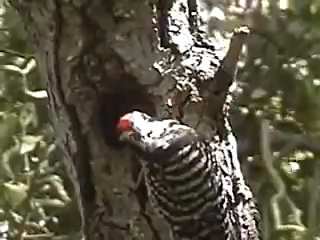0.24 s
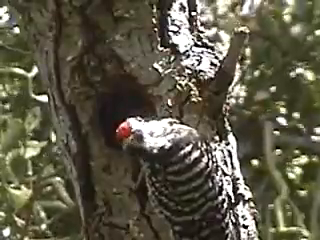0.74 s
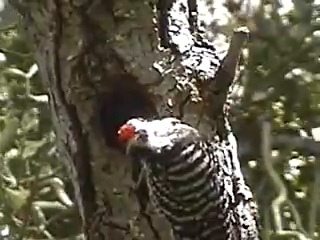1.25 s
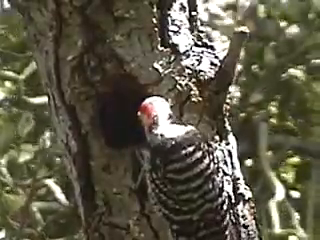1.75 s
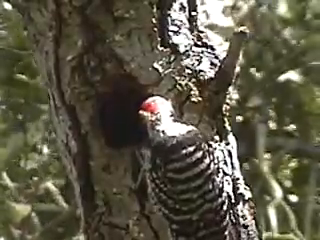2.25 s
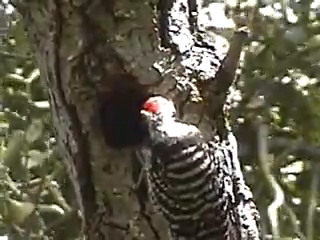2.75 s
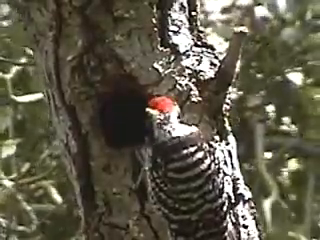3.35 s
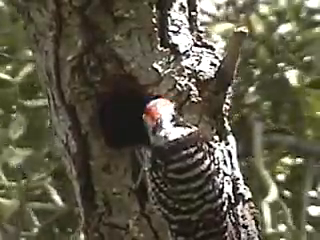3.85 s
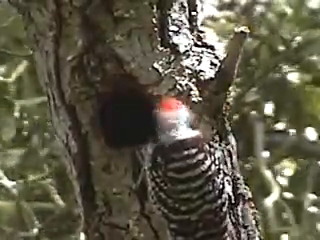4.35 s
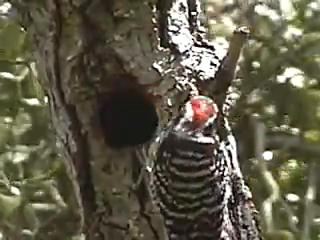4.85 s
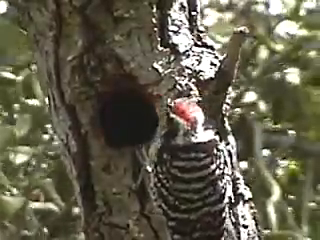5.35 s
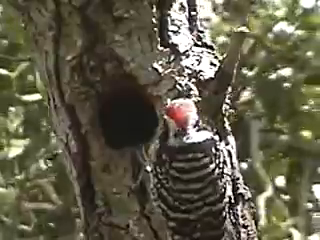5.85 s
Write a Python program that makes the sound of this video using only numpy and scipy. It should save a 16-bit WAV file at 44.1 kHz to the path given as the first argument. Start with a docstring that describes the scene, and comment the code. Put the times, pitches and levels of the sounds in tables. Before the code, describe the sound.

A close woodpecker at a tree, picked up by a small camera microphone with low rumble, faint hiss and a slightly metallic, comb-like colour. Quiet chirps come first, then a cracked note and a strained, wavering squeal. A loud snappy chip follows, then a long piercing squeak and a string of short squeaks at a quickening pace. A couple of dull microphone bumps and faint far calls sit in the steady outdoor rush, which continues alone at the end.

```python
"""A woodpecker at its nest hole, over a steady outdoor rush of filtered noise with faint, blurred far calls.
Soft chirps come first, their upper harmonics picked out by the throat; then a gritty note and a wavering squeal.
A sharp chip, a pitch plunging within milliseconds, opens a run of high squeaks that draws closer together.
Squeal and squeaks are near-pure gliding whistles, scattered by trunk and foliage.
The camera's comb filter against motor hum makes each glide beat against its own repeats."""
import sys
import numpy as np
from scipy import signal
from scipy.fft import rfft, irfft
from scipy.io import wavfile
from scipy.ndimage import uniform_filter1d

SR = 44100
rng = np.random.default_rng(int(sys.argv[2]) if len(sys.argv) > 2 else 0)


def digitize_waveform(pressure):
    """Quantize a signal to 16-bit integers and store it at the path in sys.argv[1].

    Rows of a 2-D input are taken as channels; values are limited to [-1, 1].
    """
    field = np.atleast_2d(pressure).T
    bounded = np.clip(field, -1, 1)
    quanta = np.round(bounded * 32767).astype(np.int16)
    wavfile.write(sys.argv[1], SR, quanta)


N = 268480
T = np.arange(N) / SR  # s
FREQS = np.arange(N // 2 + 1) * SR / N  # Hz
LEFT_RIGHT = np.array([[1], [-1]])  # signs of a side signal at the two ears
TREMBLE_HZ = 10  # pitch tremble per unit of shake, in squeal and squeaks


def undb(db):
    """Decibels to gain."""
    return 10 ** (np.asarray(db) / 20)


def unit(x):
    """Scale to rms 1."""
    return x / np.sqrt(np.mean(x ** 2))


def curve(rows, column=1):
    """One column of a timed table, joined by straight lines."""
    rows = np.array(rows, float)
    return np.interp(T, rows[:, 0], rows[:, column])


def colour(points):
    """Gain at every frequency from (Hz, dB) points, joined on a log frequency scale."""
    hz, db = np.transpose(points)
    return undb(np.interp(np.log(FREQS + 1), np.log(hz + 1), db))


def shaped(x, gain):
    """Filter by a gain for every frequency."""
    return irfft(rfft(x) * gain, N)


def noise(gain):
    """Noise of rms 1 with the given spectrum."""
    return unit(shaped(rng.standard_normal(N), gain))


def band(hz, width_hz):
    """A bell-shaped pass band."""
    return np.exp(-2 * ((FREQS - hz) / width_hz) ** 2)


def hiss():
    """The microphone's own smooth treble hiss: one broad bell of noise."""
    return undb(-75) * noise(band(9000, 3400))


def background():
    """A distant rush: steady rumble, a slowly swelling and wavering range above it, and narrow noise drones."""
    # Spectrum of the rush: pitch_hz, relative_density_db
    air = [(20, -21), (50, -14.5), (85, -4.5), (170, 0), (270, -9.5), (550, -6.5), (980, -5), (1400, -11.5),
           (2000, -18), (3000, -25), (6500, -33), (8800, -36.5), (12000, -63.5), (13000, -59)]
    # Stereo width of the rush: pitch_hz, side_minus_mid_db
    air_side = [(30, -24), (60, -33), (110, -29), (220, -36.5), (360, -30.5), (660, -18), (1200, -11.5),
                (2200, -13.5), (4000, -9), (7500, -5.5), (13000, 9)]
    # Slow level of the rush above its rumble: time_s, level_db
    air_swell = [(0, -45), (2.64, -46), (2.84, -42.5), (2.96, -44.5), (3.2, -45), (4.7, -48.5), (6.08, -47)]
    # Narrow noise bands: pitch_hz, width_hz, level_db
    drone_bands = [(127, 38, -55), (3995, 220, -71)]

    spectrum = colour(air)
    mid = shaped(rng.standard_normal(N), spectrum)
    side = shaped(rng.standard_normal(N), spectrum * colour(air_side))
    middle = (FREQS > 400) & (FREQS < 2000)  # the level reference
    rush = (mid + side * LEFT_RIGHT) / np.std(shaped(mid, middle))
    rumble = shaped(rush, 1 / (1 + (FREQS / 350) ** 4))
    waver_db = 0.93 * noise(band(0, 4.4))
    swell_db = curve(air_swell) + waver_db
    drones = sum(undb(db) * noise(band(hz, width_hz)) for hz, width_hz, db in drone_bands)
    return undb(-46.5) * rumble + undb(swell_db) * (rush - rumble) + drones


def far_calls(width_hz=70, octave_db=-16):
    """Distance blurs each call into two narrow noise bands an octave apart that swell and fade."""
    # Faint distant calls: middle_s, length_s, pitch_hz, level_db
    distant_calls = [(1.095, 0.064, 1040, -45.5), (2.05, 0.089, 923, -47), (2.81, 0.16, 1000, -44.5),
                     (3.166, 0.095, 990, -45.5), (3.247, 0.033, 1428, -45)]
    out = np.zeros(N)
    for middle_s, length_s, hz, db in distant_calls:
        tone = noise(band(hz, width_hz) + undb(octave_db) * band(2 * hz, 2 * width_hz))
        out += undb(db) * np.exp(-2 * ((T - middle_s) / length_s) ** 2) * tone
    return out


def bumps(width_s=0.0047, left_db=-7):
    """Dull bumps at the microphone: single slow pressure swings, stronger on the right."""
    # Bumps: middle_s, right_level_db
    bump_times = [(3.15, -36), (3.531, -31), (4.345, -50), (4.5, -45)]
    out = np.zeros(N)
    for middle_s, db in bump_times:
        u = (T - middle_s) / width_s
        out += undb(db) * (1 - u ** 2) * np.exp(-u ** 2 / 2)
    return out * undb([[left_db], [0]])


def chirps():
    """Short swelling notes whose pitch sags and then drops; the throat picks out their upper harmonics."""
    # Soft nasal chirps: start_s, length_s, pitch_hz, final_fall_share, level_before_throat_db, flutter_share
    soft_chirps = [(.005, 0.044, 3160, 0.23, -35.5, 0.045), (.228, 0.025, 2870, 0.2, -47, 0.027),
                   (0.748, 0.03, 3070, 0.056, -40, 0.045), (0.782, 0.01, 4200, 0.02, -32, 0.015),
                   (0.789, 0.038, 3075, 0.27, -24, 0.027), (0.811, 0.021, 3050, 0.092, -24, 0.022),
                   (1.087, 0.029, 2850, 0.69, -39.5, 0.035), (1.213, 0.038, 2840, 0.4, -33, 0.025),
                   (1.52, 0.034, 2830, 0.36, -45, 0.033), (1.665, 0.046, 2766, 0.017, -36.5, 0.019),
                   (1.803, 0.025, 5300, .02, -40, .015)]
    # Throat resonance: pitch_hz, gain_db
    throat = [(3000, -30), (4500, -20), (6100, -21.5), (7300, -12), (9000, -16.5), (10500, -25),
              (12500, -46)]
    throat_hz, throat_db = np.transpose(throat)
    flutter = noise(band(350, 1000))
    out = np.zeros(N)
    for start_s, length_s, hz, fall, db, rough in soft_chirps:
        on = (T > start_s) & (T < start_s + length_s)
        u = (T[on] - start_s) / length_s
        glide = 1 + 0.068 * (1 - u) ** 3 - fall * u ** 3
        pitch_hz = hz * (1 + rough * flutter[on]) * glide
        phase = 2 * np.pi * np.cumsum(pitch_hz) / SR
        tone = 0
        for k in range(1, 5):
            tone = tone + undb(np.interp(k * pitch_hz, throat_hz, throat_db)) * np.sin(k * phase)
        out[on] += undb(db) * np.sqrt(np.abs(np.sin(np.pi * u))) * tone
    return out


def quiver(rate_hz=132, drift=0.115, jitter=0.35):
    """A fast, nearly regular shake of the syrinx, with some jitter on top; rms near 1."""
    moving_rate_hz = rate_hz * (1 + drift * noise(band(0, 41.2)))
    shake = np.sqrt(2) * np.sin(2 * np.pi * np.cumsum(moving_rate_hz) / SR)
    return shake + jitter * noise(band(353.4, 640))


def whistle(hz, level_db, overtone_db, rasp, fall_db_per_khz=7.5):
    """One note of the syrinx: a sine on a moving pitch; low notes carry more overtones and rasp."""
    swell = uniform_filter1d(undb(level_db), size=16)  # softens clicks
    on = swell > 1e-6
    phase = 2 * np.pi * np.cumsum(hz[on]) / SR
    khz_above = np.clip((hz[on] - 4200) / 1000, 0, 5)
    rich = undb(overtone_db - fall_db_per_khz * khz_above)
    out = np.zeros(N)
    out[on] = np.sin(phase) + rich * (np.sin(2 * phase) + rasp[on]) + rich ** 2 * np.sin(3 * phase)
    return swell * out


def edges(start_s, end_s, rise_s, scoop_power=1.5):
    """A note scoops up as it swells and hooks down as it fades: (pitch bend Hz, level dB)."""
    scoop_hz_per_s, attack_db = 100000, 27.5
    drop_hz, drop_s, release_db, release_s = 1650, 0.0052, 20, 0.0086
    close_s = 0.0022  # the very last of the note ramps to silence
    to_rise = np.clip((start_s + rise_s - T) / rise_s, 0, 1)  # 1 at the start, 0 once risen
    to_end_s = np.maximum(end_s - T, 0)
    scoop_hz = scoop_hz_per_s * rise_s * to_rise ** scoop_power
    bend_hz = -scoop_hz - drop_hz * np.exp(-to_end_s / drop_s)
    closing_db = 20 * np.log10(np.clip(to_end_s / close_s, 1e-6, 1))
    db = -attack_db * to_rise - release_db * np.exp(-to_end_s / release_s) + closing_db
    return bend_hz, np.where((T > start_s) & (T < end_s), db, -np.inf)


def long_note(rows, level_db, tremble_hz, overtone_db, rasp):
    """A held whistle on its own pitch curve, with the short notes' swell and fade but no scoop or hook."""
    rise_s, finish_s = 0.0009, 0.012
    _, edge_db = edges(rows[0][0] - rise_s, rows[-1][0] + finish_s, rise_s)
    return whistle(curve(rows) + tremble_hz, level_db + edge_db, overtone_db, rasp)


def squeal(shake, rasp):
    """A gritty opening note, then a long climbing one that throbs under strain and clears at the top."""
    # Short opening note that cracks downwards: time_s, pitch_hz, level_before_trim_db
    opening_points = [(1.951, 5570, -32.5), (1.972, 5650, -26), (1.984, 5740, -33), (1.992, 5660, -18.5),
                      (2.004, 5420, -28), (2.019, 5620, -19), (2.03, 4270, -20.5), (2.044, 4215, -28),
                      (2.06, 4230, -42)]
    # Long wavering note: time_s, pitch_hz, level_before_trim_db
    climb_points = [(2.112, 5500, -37), (2.13, 5910, -27), (2.146, 6160, -24), (2.173, 6490, -24),
                    (2.181, 5820, -10.5), (2.194, 6100, -43), (2.215, 6620, -27), (2.262, 7065, -31.5),
                    (2.31, 7112, -22), (2.36, 7176, -21.5), (2.4, 7200, -27.5), (2.44, 7305, -20.5),
                    (2.49, 7640, -23), (2.519, 7900, -26), (2.527, 8170, -18.5), (2.545, 8234, -22),
                    (2.58, 8040, -25), (2.596, 7970, -32), (2.605, 7476, -21.5), (2.638, 7430, -30),
                    (2.66, 7380, -20), (2.71, 6760, -34)]
    # Strain, which makes pitch tremble and level throb: time_s, strain_0_to_1
    strain_points = [(2.1, .15), (2.2, 0.5), (2.27, 0.8), (2.32, 0.54), (2.38, 0.7), (2.44, 1), (2.48, .6),
                     (2.52, 0), (2.7, 0.4)]
    opening_trim_db, climb_trim_db = -2, -1
    strain_hz, throb_db = 35, 4.5  # per unit of shake at full strain
    grit_hz, grit_db = 35, 1.2  # rms at full grit

    strain = curve(strain_points)
    low = np.clip((7000 - curve(climb_points)) / 1000, 0, 1)  # grit grows below 7 kHz
    tremble_hz = shake * (TREMBLE_HZ + strain_hz * strain) + grit_hz * low * noise(band(300, 700))
    rough_db = throb_db * strain * (shake - .5) + grit_db * low * noise(band(180, 420))
    opening_db = curve(opening_points, column=2) + opening_trim_db + rough_db
    climb_db = curve(climb_points, column=2) + climb_trim_db + rough_db
    opening = long_note(opening_points, opening_db, tremble_hz, overtone_db=-4.5, rasp=undb(-14) * rasp)
    climb = long_note(climb_points, climb_db, tremble_hz, overtone_db=-1.5, rasp=undb(-49) * rasp)
    return opening + climb


def chips(rasp):
    """The pitch plunges within a few ms while the level flares and dies; overtones dull less with pitch."""
    # Sharp plunges that open a squeak, some doubled:
    # loudest_s, rise_s, fade_s, plunge_s, top_hz, bottom_hz, level_db, overtones_db (at 4200 Hz and below)
    chip_plunges = [(3.145, 0.0004, 0.0011, 0.00045, 8830, 3440, -4, -10),
                    (3.1472, 0.00074, 0.0016, 0.00081, 4740, 2880, -7.5, -16),
                    (3.3532, 0.0011, 0.0015, 0.00076, 9700, 9500, -24, -43),
                    (4.1241, 0.0011, 0.00035, 0.0007, 10230, 4620, -6.5, -45),
                    (4.1241, 0.00028, .0006, 0.00084, 6680, 5970, -36, -41),
                    (4.479, 0.0014, 0.0017, 0.0012, 9700, 8200, -22, -45),
                    (5.028, .001, .002, .001, 9100, 8150, -24, -45),
                    (5.306, 0.00087, .002, 0.0016, 8910, 7350, -14, -38.5)]
    out = np.zeros(N)
    for loudest_s, rise_s, fade_s, plunge_s, top_hz, bottom_hz, db, overtone_db in chip_plunges:
        age_s = T - loudest_s
        hz = bottom_hz + (top_hz - bottom_hz) * (1 - np.tanh(age_s / plunge_s / 2)) / 2
        flare_db = -20 / np.log(10) * (age_s / np.where(age_s < 0, rise_s, fade_s)) ** 2
        out += whistle(hz, db + flare_db, overtone_db, rasp, fall_db_per_khz=4)
    return out


def squeaks(shake, rasp, overtone_db=-8):
    """One drawn-out squeak among short ones that bend along a curve and hook down; some jump in pitch."""
    # Drawn-out squeak, pitch: time_s, pitch_hz
    lead_pitch = [(3.35, 9141), (3.382, 9399.5), (3.414, 9224.5), (3.49, 9504), (3.598, 9054.5),
                  (3.615, 8724.5), (3.652, 8305.5), (3.673, 7681), (3.698, 7747), (3.704, 8061.5),
                  (3.724, 8034), (3.74, 7705)]
    # Drawn-out squeak, level: time_s, level_before_trim_db
    lead_level = [(3.352, -24.5), (3.358, -22), (3.55, -13), (3.582, -17), (3.598, -17), (3.675, -22),
                  (3.685, -30.5), (3.702, -21), (3.732, -32.5), (3.74, -29)]
    # Short squeaks, pitches before scoop, jump and hook: start_s, length_s, rise_s, start_hz, third_hz,
    # two_thirds_hz, end_hz, level_db, fade_over_note_db, jump_place_share, jump_hz
    short_squeaks = [(3.142, 0.068, .022, 5290, 6150, 6780, 7070, -19.5, 12, 0, -0.5),
                     (3.831, 0.21, 0.0084, 7640, 7625, 7990, 8100, -16, 7.5, .5, 125),
                     (4.123, 0.055, 0.0025, 8140, 7770, 8140, 8750, -13.5, 8.5, 0, 1.5),
                     (4.162, 0.079, .014, 8580, 8645, 8550, 8610, -17, 0, 0, 0),
                     (4.317, 0.11, .013, 8423, 8470, 8326, 7960, -10, 18, 0, -2.5),
                     (4.476, 0.082, 0.0069, 8730, 8950, 8890, 8470, -16, 2, 0, -3),
                     (4.622, 0.059, 0.017, 8760, 8475, 8410, 8470, -11.5, 10, 0, 4),
                     (4.755, 0.061, 0.012, 8580, 8860, 8780, 8740, -12.5, 6.5, 0.49, -170),
                     (4.889, 0.062, 0.0081, 7800, 8290, 8180, 8560, -15, 3, 0.76, -270),
                     (5.024, 0.081, 0.014, 8470, 8640, 8590, 8390, -22, -6, 0, 1.5),
                     (5.177, 0.057, .014, 8460, 8175, 8250, 7960, -10.5, 12.5, 0.58, -280),
                     (5.304, 0.069, 0.0029, 7590, 7400, 7090, 7030, -16, 6, 0, 2)]
    lead_trim_db, jump_s = 1.5, 0.0015
    tremble_hz = TREMBLE_HZ * shake
    out = long_note(lead_pitch, curve(lead_level) + lead_trim_db, tremble_hz, overtone_db, rasp)
    for start_s, length_s, rise_s, *pitches_hz, db, fade_db, jump_at, jump_hz in short_squeaks:
        progress = np.clip((T - start_s) / length_s, 0, 1)
        cubic = np.polyfit(np.linspace(0, 1, 4), pitches_hz, 3)  # passes through all four pitches
        arch_hz = np.polyval(cubic, progress)
        step_hz = jump_hz * (1 + np.tanh((progress - jump_at) * length_s / jump_s)) / 2
        bend_hz, edge_db = edges(start_s, start_s + length_s, rise_s)
        hz = arch_hz + step_hz + bend_hz + tremble_hz
        out += whistle(hz, db - fade_db * progress + edge_db, overtone_db, rasp)
    return out


def scatter(x, db, t60, onset_s, per_s):
    """A fading spray of separate reflections, partly different at each ear."""
    fade = np.exp(-np.log(1000) * T / t60) * np.clip(T / onset_s - 1, 0, 1)
    mid, side = rng.standard_normal((2, N)) * fade * (rng.random(N) < per_s / SR)
    response = mid + 0.43 * side * LEFT_RIGHT
    return undb(db) * shaped(x, rfft(response) / np.sqrt(np.sum(mid ** 2)))


def surroundings(voice):
    """Direct sound, then scatter from trunk and branches and from the wider foliage."""
    # Lean of the direct sound, furthest left near 9 kHz: pitch_hz, left_minus_right_db
    lean_points = [(3000, -0.5), (5600, 2.5), (7000, 2), (7700, 3), (8400, 4.5), (8650, 3), (8950, 12),
                   (9300, 6.5), (9500, 9), (12000, 3.5)]
    lean = colour(lean_points)
    lag = np.exp(-2j * np.pi * FREQS * 1.2e-5)  # the sound reaches the right port 12 microseconds early
    ears = np.array([lean * lag, np.ones(len(lean))]) * 2 / (1 + lean)
    direct = shaped(voice, ears)
    trunk = scatter(voice, db=-7.5, t60=0.1, onset_s=0.0031, per_s=1800)
    foliage = scatter(voice, db=-22.5, t60=0.32, onset_s=0.019, per_s=560)
    return direct + trunk + foliage


def scene():
    """The bird's calls in their surroundings, the soft chirps more diffuse, over the background."""
    shake, rasp = quiver(), noise(band(10800, 3800))
    soft = chirps()
    voice = soft + squeal(shake, rasp) + chips(rasp) + squeaks(shake, undb(-44) * rasp)
    diffuse = scatter(soft, db=-8.5, t60=0.18, onset_s=0.0046, per_s=4000)
    return surroundings(voice) + diffuse + background() + far_calls() + bumps() + hiss()


def record(dry):
    """The camera subtracts fading repeats one motor turn apart, notching its hum's multiples; then cuts the top."""
    motor_hz, top_hz = 149.85, 13200
    turn = np.exp(-2j * np.pi * FREQS / motor_hz)  # a delay of one turn
    combed = shaped(dry, (1 - .87 * turn) / (1 - .47 * turn))
    low_pass = signal.ellip(10, .2, 80, top_hz, fs=SR, output="sos")
    return signal.sosfilt(low_pass, combed)


dry = scene()
out = record(dry)
digitize_waveform(out)
```